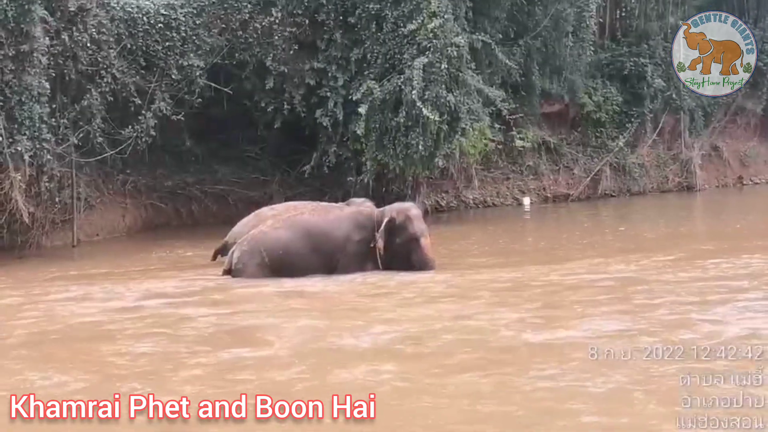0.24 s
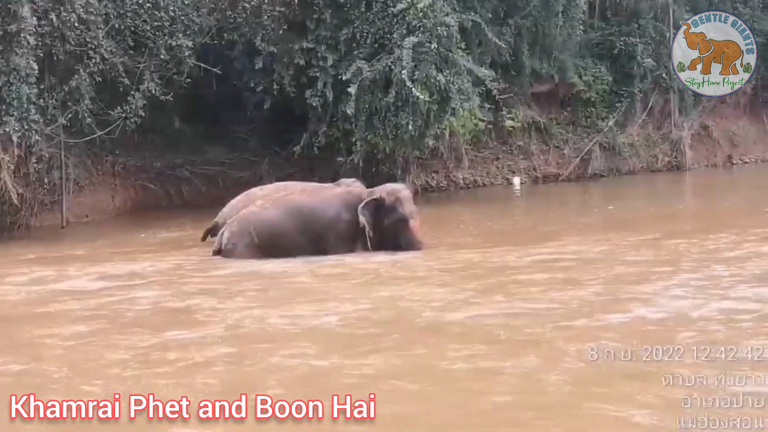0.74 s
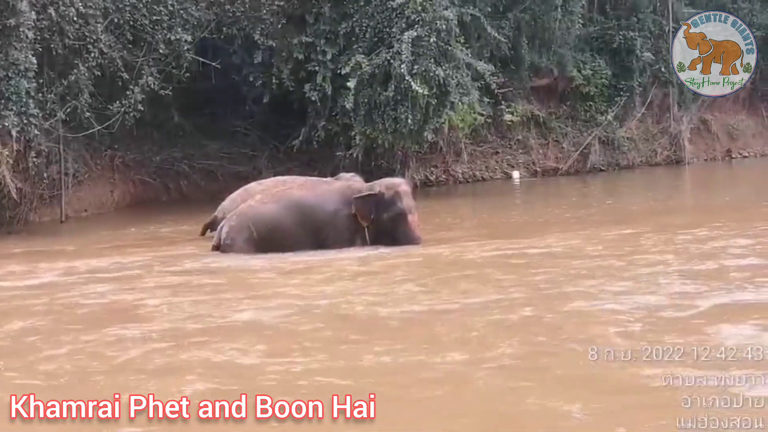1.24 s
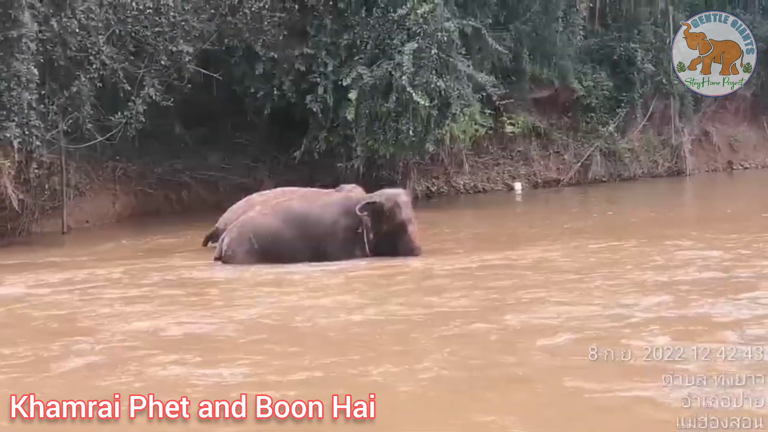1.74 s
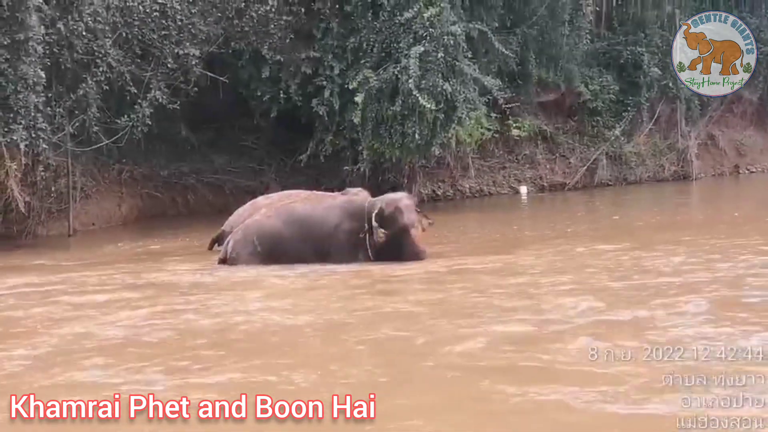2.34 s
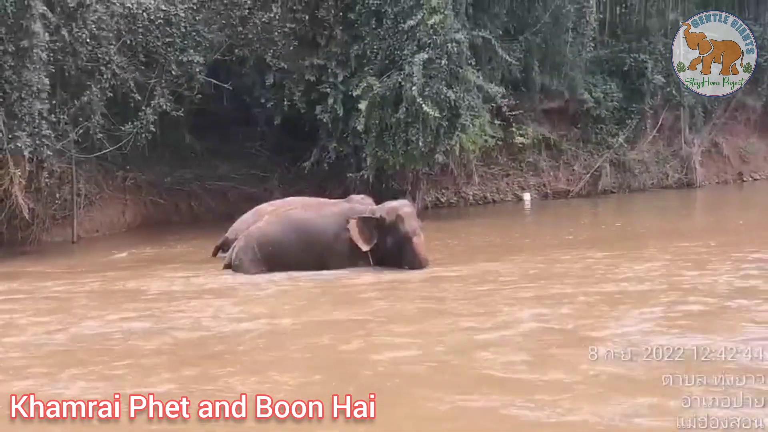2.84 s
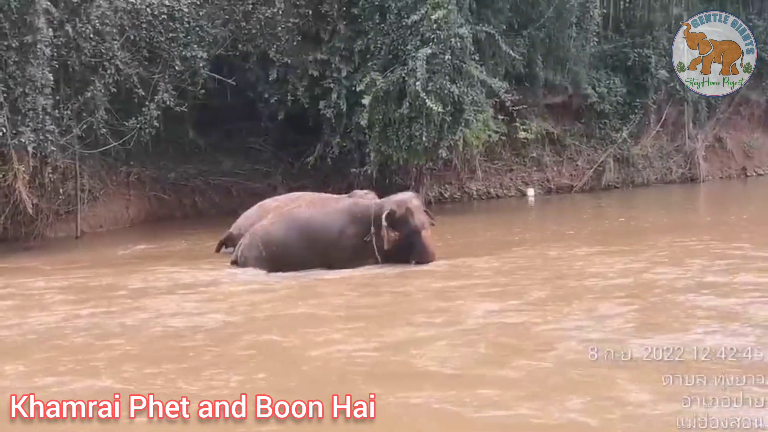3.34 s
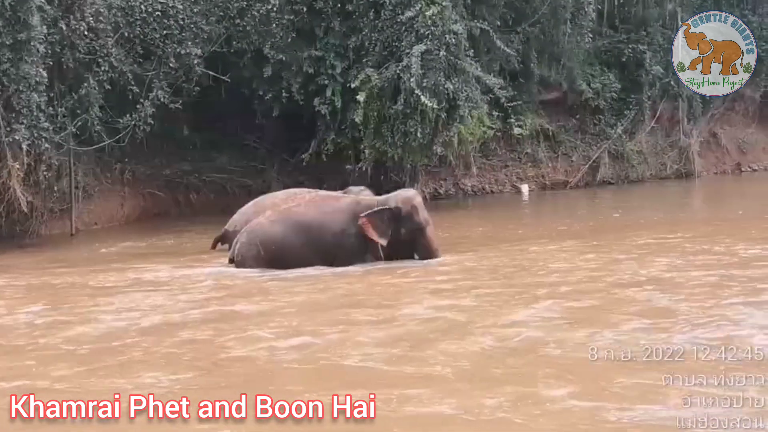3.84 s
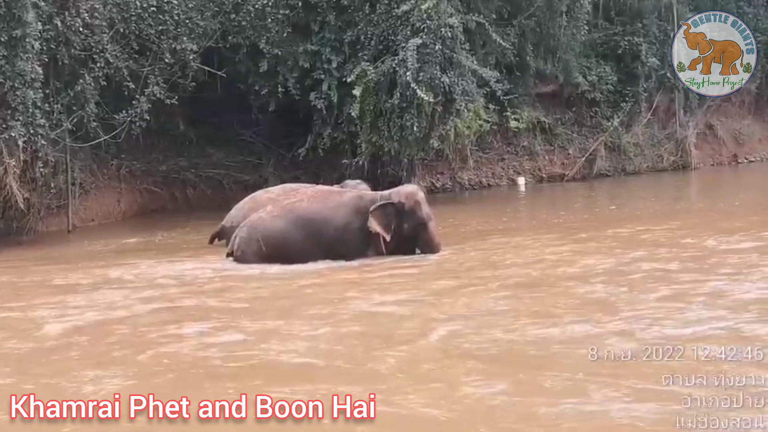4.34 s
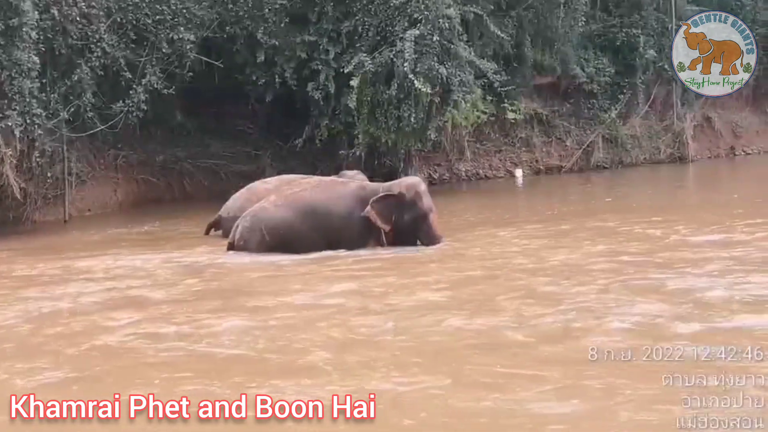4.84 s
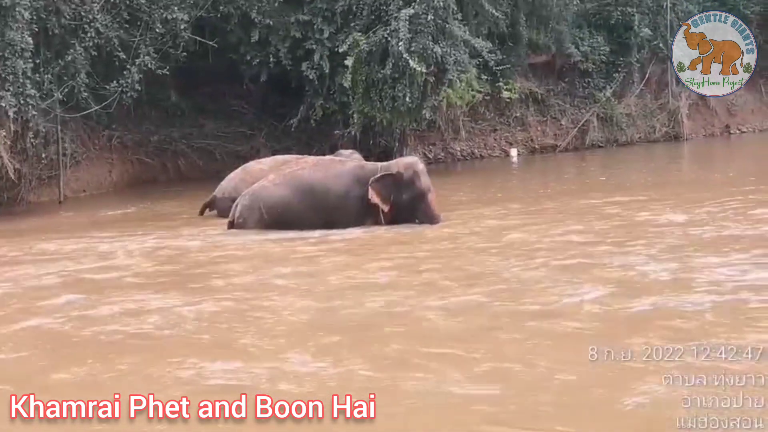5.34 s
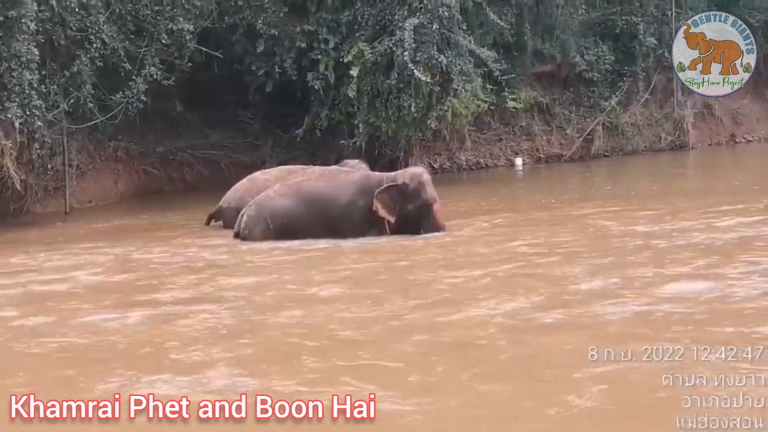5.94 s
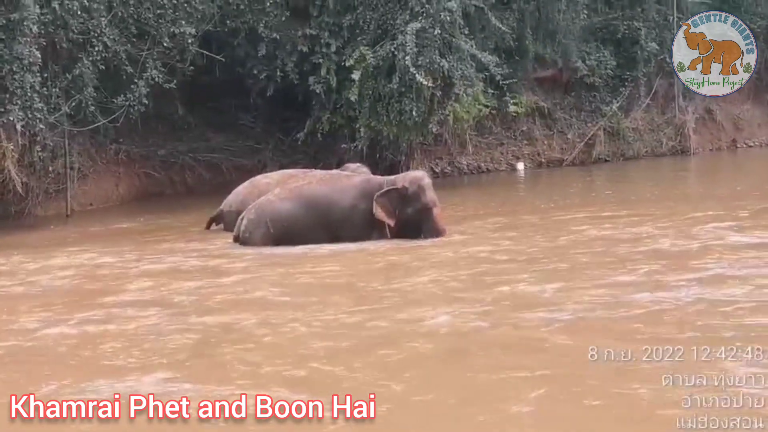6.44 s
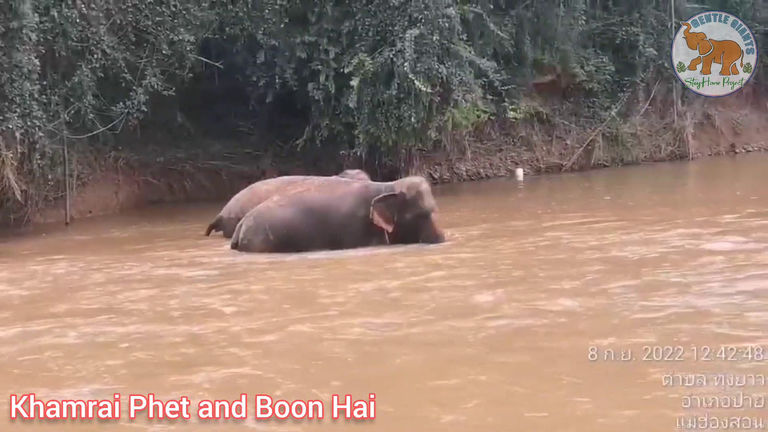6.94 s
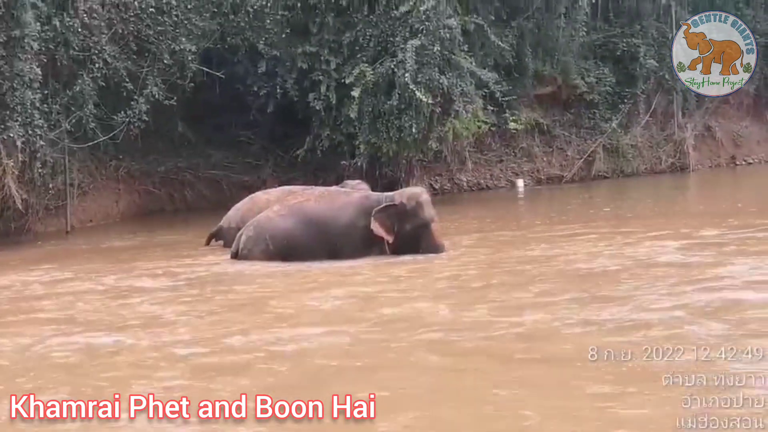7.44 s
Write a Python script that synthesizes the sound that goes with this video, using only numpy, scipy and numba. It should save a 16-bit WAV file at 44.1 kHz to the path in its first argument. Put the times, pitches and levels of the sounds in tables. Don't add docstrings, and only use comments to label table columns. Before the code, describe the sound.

A riverbank outdoors, heard on a phone whose left side is louder. From 0 s, low gusty wind buffets and pops against the microphone over restrained, slightly patchy water hiss, with tiny drips and barely audible bird peeps near 0.8 s. At 1.55 s an elephant starts a slow purr of separate throat pulses, opening by 2 s into a harsh, hollow roar. It swells around 2.3 s and again near 2.75 s, crackling and raspy, with an unsteady low singing tone inside; the water hiss brightens with it. From 3 s it collapses, fading into slow pulses by 4 s with a short outdoor echo. From about 4.3 s a second elephant gives a deep, steady, closed-mouth flutter, about 25 pulses a second, growing slightly toward 7.6 s. Drips continue, a faint chirp comes at 5.9 s, a plop at 7 s, and sharp wind slaps crowd the last second.

```python
import sys
import numpy as np
from scipy import signal
from scipy.io import wavfile
from scipy.ndimage import uniform_filter1d
from numba import njit

SR = 44100
rng = np.random.default_rng(int(sys.argv[2]) if len(sys.argv) > 2 else 0)


def inscribe(sig):
    pcm = np.round(np.clip(np.atleast_2d(sig).T, -1, 1) * 32767)
    wavfile.write(sys.argv[1], SR, pcm.astype(np.int16))


def gain_from_db(level_db):
    decades = np.asarray(level_db, float) / 20
    return 10 ** decades


N = 339570
T = np.arange(N) / SR
LEFT_DB = 9

# time in seconds, turbulent share 0-1, loudness in dB.
CALL = [(1.55, 0.05, -59.5), (1.64, 0.4, -52), (1.84, 0.45, -44.5), (2.02, 0.58, -33), (2.28, 0.82, -25.5),
        (2.42, 0.78, -23), (2.55, 0.98, -28), (2.74, 0.99, -25), (2.95, 0.38, -23), (3.03, 1, -29),
        (3.21, 0.76, -43), (3.42, 0.85, -45), (3.58, 0.35, -50), (3.85, 0.37, -52), (3.97, 0.53, -59),
        (4.2, 0.25, -57), (4.6, 0.38, -56.5), (4.9, 0.22, -57.5), (5.2, 1, -63.5), (5.5, 0.46, -59),
        (5.95, 0.2, -60.5), (6.3, 0.8, -63), (7.7, 0.5, -58.5)]
# time in seconds, flaps done so far.
FLAPS = [(0, -33), (1.556, 1), (1.644, 3), (1.805, 7), (1.917, 10), (3.217, 60), (3.478, 67), (3.714, 73),
         (3.853, 76), (4.101, 81), (4.368, 86), (4.744, 93), (4.952, 97), (5.364, 105), (5.569, 109),
         (5.972, 117), (6.88, 135), (7.7, 151.2)]
# time in seconds, even minus odd in dB,
# half length in seconds.
LIMPS = [
    (4.3, 3, 0.14),
    (5.47, -6.5, 0.064),
]


def roarer():
    (turbulence, loudness_db), (flaps,) = curves(CALL), curves(FLAPS)
    turbulence = np.clip(turbulence, 0, 1)
    scatter = 0.05 + (0.6 - 0.05) * opened((0, 1)) ** 2
    hard_closings = snaps(loudness_db)
    drive = folds(flaps, scatter, turbulence, swells(LIMPS), 1.35) + hard_closings
    voice = throat(drive, hard_closings, turbulence)
    return gain_from_db(loudness_db) * voice * gate(1.52, 9, 0.041) + rasp(drive) + song()


# time in seconds, opening 0-1, jaw resonance in Hz, throat resonance in Hz,
# tongue drawn back 0-1.
MOUTH = [(1.6, 0, 108, 273, 0.43), (1.95, 0.46, 143, 267, 0.13), (2.1, 0.78, 167, 348, 0.89),
         (2.4, 1, 213, 354, 0.1), (2.62, 0.85, 206, 331, 0.68), (2.8, 0.96, 186, 308, 0.12),
         (2.96, .95, 191, 284.6, 0.3), (3.15, 0.39, 135.4, 306.5, 0.07), (4.2, 0, 111.3, 325, 0.16)]


def opened(pair):
    shut, wide = pair
    return shut + (wide - shut) * curves(MOUTH)[0]


# time in seconds, lift in dB, half length in seconds.
STRAINS = [
    (1.85, 1, 0.093),
    (2.04, 12, 0.014),
    (2.27, 29, 0.21),
    (2.5, 16, 0.042),
    (2.76, 17, 0.16),
    (3.5, 3, 0.092),
]
# centre in Hz, width in Hz, level in dB.
UPPER = [(1359, 82, -3), (1890, 43, -10)]
# centre in Hz, width in Hz, dB mouth shut, dB mouth open.
VALLEYS = [(470, 74, -25.5, -21.5), (818, 53, -30, -30), (692, 98, -34, -19)]


def throat(drive, hard_closings, turbulence):
    _, jaw_hz, throat_hz, tongue = curves(MOUTH)
    third_hz = opened((642, 642)) * (1 - 0.23 * tongue)
    fourth_hz = opened((763, 792)) * (1 - 0.22 * tongue)
    tract = jaw_hz, throat_hz, third_hz, fourth_hz, opened((853, 980))
    widths_hz = 30, 90, 62, 85, 60
    rung = []
    for hz, width in zip(tract, widths_hz):
        unsteady_hz = hz * (1 + 0.035 * turbulence * walk(25))
        rung.append(ring(drive, unsteady_hz, width, 0.8 * turbulence))
    jaw, second, third, fourth, fifth = rung

    strain_db = swells(STRAINS)
    low_db = opened((12.5, -11)) + swells([(2.61, 7.1, 0.042)])
    mid_db = opened((5, -12)) + 0.39 * strain_db
    upper_db = opened((-5.5, -37)) + strain_db

    fifth_db = swells([(2.405, -16, 0.16), (1.88, 6, 0.14), (2.78, 7, 0.087)])
    sag = 1 - 0.038 * np.clip((T - 2.27) / 0.27, 0, 1)
    late_swells = (3.3, 4.7, 0.05), (2.8, -18, 0.25)
    cavities = 0
    for k, (hz, width, db) in enumerate(UPPER):
        cavity_db = db + 4.8 * walk(16) + swells([late_swells[k]])
        cavities = cavities + (-1) ** k * gain_from_db(cavity_db) * ring(drive, hz * sag, width)
    upper = gain_from_db(fifth_db) * fifth + gain_from_db(-12.5 + 9.7 * turbulence) * cavities

    second_db = -3.5 * gate(2.54, 2.7, 0.081)
    middle = third - gain_from_db(-16.5 + 13.8 * turbulence) * fourth
    voice = gain_from_db(low_db) * jaw - gain_from_db(second_db) * second
    voice = voice + gain_from_db(mid_db - 5.5) * middle + gain_from_db(upper_db - 6.5) * upper
    voice = voice + gain_from_db(opened((-2, -12))) * ring(drive, 224.5, 99)
    for hz, width, *leak_db in VALLEYS:
        voice = voice + gain_from_db(opened(leak_db)) * level(band(drive, hz, width))
    return voice + gain_from_db(-14.5) * ring(hard_closings, 495, 240)


# time in seconds, peak in dB.
SNAPS = [(2.04, -28), (2.078, -32.5), (2.123, -28), (2.161, -30), (2.181, -30), (2.219, -25), (2.249, -24),
         (2.274, -19.5), (2.301, -24), (2.341, -19.5), (2.383, -27.5), (2.426, -26), (2.453, -29),
         (2.477, -19.5), (2.526, -29), (2.558, -35.5), (2.61, -25), (2.636, -19.5), (2.706, -28),
         (2.746, -27), (2.772, -25), (2.824, -21), (2.852, -26.5), (2.9, -34), (2.941, -29), (2.968, -29),
         (3.089, -36), (3.114, -28), (3.217, -30), (3.29, -37.5)]


def snaps(call_db):
    out = np.zeros(N)
    for s, db in SNAPS:
        i = int((s - 0.000997) * SR)
        out[i] = np.sqrt(SR / 38) * gain_from_db(db - call_db[i] - 6)
    return out


# time in seconds, half length in seconds, level in dB.
RASPS = [(2.253, 0.057, -51), (2.3, 0.015, -55), (2.62, 0.01, -51), (2.646, 0.009, -50),
         (2.731, 0.018, -52.5), (2.78, 0.015, -55), (2.85, 0.035, -53)]
# centre in Hz, width in Hz, level in dB.
RASP = [(2220, 220, -7), (2780, 260, -3), (3590, 260, -9), (4350, 400, -10)]
# time in seconds, centre in Hz, level in dB.
WANDER = [(2.1, 2750, -80), (2.2, 2900, -59), (2.3, 3100, -67), (2.4, 2700, -85), (2.47, 2720, -64.5),
          (2.52, 3460, -63), (2.65, 3750, -61), (2.75, 3540, -61), (2.8, 3600, -64), (2.86, 2640, -58),
          (2.9, 2700, -70), (2.93, 4470, -72), (2.97, 4470, -52), (3.04, 4650, -59), (3.09, 4400, -68),
          (3.15, 4550, -61), (3.25, 4550, -77)]
# time in seconds, half length in seconds, level in dB,
# middle pitch in Hz, glide in Hz per second.
SIDE_LINES = [(2.545, .075, -38, 745, -560), (2.55, .08, -36, 200, -60), (2.3, .05, -37, 585, 100),
              (2.92, .05, -38, 645, -250), (2.73, .025, -43, 850, 0), (2.13, .025, -41, 560, 0)]


def rasp(drive):
    harsh = sum(gain_from_db(db) * bump(s, half) for s, half, db in RASPS)
    small = sum(gain_from_db(db + 2.0 * walk(31.3)) * ring(drive, hz, width) for hz, width, db in RASP)
    wander_hz, wander_db = curves(WANDER)
    wandering = gain_from_db(wander_db + 1.4 * walk(30)) * ring(drive, wander_hz, 210) * gate(2.1, 3.25, 0.02)
    wobble, flutter = 0.03 * walk(90), gain_from_db(4 * walk(70))
    lines = sum(whistle(*row, wobble=wobble) for row in SIDE_LINES)
    return harsh * small + wandering + np.sqrt(2) * flutter * lines


# time in seconds, pitch in Hz, level in dB.
SONG = [(2.18, 329.6, -35), (2.224, 346.8, -26), (2.276, 401.5, -22), (2.338, 393.6, -22.5),
        (2.39, 370.8, -31), (2.432, 324.7, -21), (2.455, 346.3, -26), (2.478, 374.2, -21.5),
        (2.52, 365.8, -24.5), (2.56, 358.5, -24), (2.62, 353.9, -20), (2.668, 356.4, -20.5),
        (2.705, 386.5, -15), (2.728, 350.8, -25), (2.75, 366.7, -24), (2.77, 378.2, -20),
        (2.82, 375.3, -22.5), (2.88, 383.4, -20), (2.908, 346.2, -21), (2.926, 339.3, -30),
        (2.944, 323, -23), (2.968, 281, -18.5), (2.99, 273, -27), (3.03, 269, -30), (3.12, 271, -43)]


def song():
    hz, db = curves(SONG)
    turn = 2 * np.pi * np.cumsum(hz * (1 + 0.016 * walk(70))) / SR
    loudness = np.sqrt(2) * gain_from_db(db + 1.1 * walk(55))
    octave = gain_from_db(-24 + 4.7 * walk(60)) * np.sin(2 * turn)
    return loudness * (np.sin(turn) + octave) * gate(2.17, 3.15, 0.026)


def folds(phase, scatter, turbulence, limp_db=0., uneven_db=1.5):
    hz = np.maximum(np.gradient(phase) * SR, 1)
    phase = np.maximum.accumulate(phase + scatter * walk(30))
    cycle = np.floor(phase).astype(int)
    size_db = rng.standard_normal(N // 100)[cycle] * uneven_db + limp_db * (-1.) ** cycle
    clicks = np.diff(cycle, prepend=cycle[0]) * np.sqrt(SR / hz)
    puffs = rng.standard_normal(N) * 1.8 * np.exp(-(phase % 1) / 0.6)
    return gain_from_db(size_db) * (np.sqrt(1 - turbulence) * clicks + np.sqrt(turbulence) * puffs)


# time in seconds, level in dB.
ANSWER = [(4.3, -47.5), (4.55, -49.5), (5.0, -50), (6.0, -49.5), (6.89, -49), (7.35, -47), (7.7, -45.5)]
# time in seconds, flaps a second.
ANSWER_HZ = [(4.4, 23.2), (4.64, 23.7), (5.1, 24.4), (6.87, 25.7), (7.0, 25.4), (7.23, 25.9), (7.68, 26.0)]
# centre in Hz, width in Hz, level in dB.
CHEST = [(72.57, 60, 0.5), (128.7, 44, 7.5), (201.6, 35, 4), (269.4, 29.5, -6.5), (313.3, 21, -11.5),
         (788, 37, -17), (2057, 56, -25)]


def answerer():
    (hz,), (db,) = curves(ANSWER_HZ), curves(ANSWER)
    drive = folds(np.cumsum(hz) / SR, 0.005, 0.02, uneven_db=0.9)
    rise = hz / 24.4
    voice = 0
    for k, (centre, width, chest_db) in enumerate(CHEST):
        voice = voice + (-1) ** k * gain_from_db(chest_db + 1.64 * walk(4.6)) * ring(drive, centre * rise, width)
    return gain_from_db(db - 1) * voice * gate(4.13, 9, 0.54)


# time in seconds, peak in dB, left minus right in dB,
# half length in seconds.
GUSTS = [(-0, -32, 22, 0.11), (0.293, -35.5, 12, 0.055), (0.477, -35, 34, 0.2), (0.897, -35, 11, 0.06),
         (1.025, -37, 26, 0.033), (1.2, -34, 22, 0.016), (1.387, -30.5, 28, 0.056), (1.685, -27, 27, 0.009),
         (2.084, -43, 36, 0.012), (3.064, -26.5, 17, 0.05), (3.3, -31, 32, 0.058), (4.118, -44, 26, 0.074),
         (4.276, -33.5, 30, 0.02), (4.574, -33, 6, 0.11), (4.716, -33, 38, 0.098), (5.248, -37, 2, 0.2),
         (5.53, -36.5, -2, 0.045), (5.917, -40.5, 7, 0.041), (6.263, -29.5, 13, 0.088),
         (6.718, -38, -17, 0.087), (6.77, -29.5, 5, 0.042), (7.017, -32.5, 5, 0.055),
         (7.184, -42, -23, 0.069), (7.231, -25.5, 7, 0.01), (7.407, -26.5, 2, 0.048),
         (7.678, -40, -2, 0.14)]
# time in seconds, port 0 left 1 right, level in dB, sharpness in ms.
SLAPS = [(0.271, 0, -12.5, 1.6), (0.285, 0, -46, 2.6), (0.672, 0, -16, 2.2), (0.912, 1, -51, 2.3),
         (1.178, 0, -15, 1.8), (1.35, 1, -18, 2.3), (1.378, 0, -14.5, 2.8), (4.562, 0, -11.5, 1.5),
         (6.464, 0, -12.5, 0.93), (6.644, 1, -15.5, 1.23), (6.721, 1, -14.5, 0.99), (6.775, 0, -10, 1.5),
         (6.836, 0.77, -27, 3), (7.026, 0, -18.5, 0.58), (7.184, 1, -11, 1.7), (7.431, 0, -6, 1.2),
         (7.439, 1, -15, 1.4), (7.597, 1, -19, 1.1), (7.67, 1, -12, 0.94)]
# time in seconds, level in dB, extra reach in dB per octave.
BREEZE = [(0, -53.5, 1), (1.0, -41.5, -6.5), (1.9, -40.5, 3.5), (2.85, -39, -8.5), (3.5, -39.5, 2.5),
          (4.15, -36, -5), (5.0, -50.5, 2.5), (6.0, -35, -1.5), (6.6, -35, -1.5), (7.7, -43.5, 4.5)]
# time in seconds, change in dB, half length in seconds.
LULLS = [
    (.2, -11, 0.029),
    (.79, -5, 0.047),
    (1.05, 3, 0.15),
    (1.52, -2.5, 0.11),
    (4.0, -6.5, 0.18),
]
# frequency in Hz, level in dB per Hz.
WIND = [(15, -4), (38, -2), (70, -2), (108, -5), (150, -10), (190, -18), (270, -36), (400, -54), (600, -64)]


def wind():
    def share(pan_db):
        return gain_from_db(12) / (1 + gain_from_db(-2 * pan_db))

    breeze_db, calm_reach_db = curves(BREEZE)
    lull_db = swells(LULLS)
    ports = []
    for side in (1, -1):
        calm = gain_from_db(2 * (breeze_db + lull_db)) * share(side * 11)
        gusty = calm
        for s, db, pan_db, half in GUSTS:
            gusty = gusty + gain_from_db(2 * db) * share(side * pan_db) * bump(s, half)
        port_db = 10 * np.log10(gusty)
        reach_db = calm_reach_db + 0.51 * lull_db - 0.22 * 10 * np.log10(gusty / calm)
        lump, air, rumble = walk(28), rng.standard_normal((2, N)), 0
        for k, hz in enumerate(16 * 2 ** np.arange(0, 5.3, .5)):
            octaves_up = max(np.log2(hz / 45), 0)
            swing_db = octaves_up * (reach_db + 1.7 * lump) + 1.1 * lump + 1.2 * walk(8)
            rumble = rumble + gain_from_db(colour(WIND, hz) + swing_db) * band(air[k % 2], hz, hz / 5.03)
        rumble = rumble / np.std(band(rumble, 37, 73)) * gain_from_db(-0.5)
        passing = rng.random(N) < 22 / SR
        eddies = passing * rng.laplace(size=N) * gain_from_db(-2.0 + 4.3 * reach_db)
        eddies = signal.fftconvolve(eddies, cusp(.05, 2.6)[:SR // 10], "same")
        ports.append(gain_from_db(port_db) * (rumble + eddies))
    ports = np.array(ports)
    for s, port, slap_db, ms in SLAPS:
        ports[int(port)] += gain_from_db(slap_db) * cusp(s, ms)
    return ports


def cusp(s, ms):
    u = (T - s) * 1000 / ms
    return 1.6 * np.exp(-np.sqrt(u ** 2 + .25)) - .35 * np.exp(-(u / 4.5) ** 2)


# frequency in Hz, level in dB per Hz.
RIVER = [(450, -6.5), (760, 1.5), (1300, -4), (2100, -1), (2600, -5.5), (3600, -7), (5500, -7.5),
         (6700, -4.5), (8000, -10.5), (9100, -7), (10200, 0), (11400, -10.5), (13000, -13.5),
         (15300, -20.5)]
# frequency in Hz, left minus right in dB.
BALANCE_DB = [(500, 5), (1300, 11), (2400, 10.5), (4400, 4.5), (9500, 11), (15000, 14.5)]


def river():
    hz, s, cells = signal.stft(rng.standard_normal((2, N)), SR, nperseg=1024)
    hz = np.maximum(hz, 1)[:, None]
    shape = cells.shape[1:]
    lift_db = noise_filter()[np.minimum(s * SR, N - 1).astype(int)]
    treble_db = -63.5 + lift_db
    middle_db = -63.5 - 2.5 + 0.68 * lift_db
    lapping_db = -59.5 + 0.35 * (treble_db - treble_db.mean())
    shape_db = colour(RIVER, hz)
    gain_db = np.zeros(shape)
    for lo, hi, db in ((0, 2197, lapping_db), (2193, 7700, middle_db + 2.0), (7698.0, SR, treble_db + 3.0)):
        part = (hz >= lo) & (hz < hi)
        gain_db += part * (shape_db + db - 10 * np.log10(np.mean(part * gain_from_db(2 * shape_db))))
    blotch_db = 1.64 * patches(shape, bins=150, frames=1.5) + 2.0 * patches(shape, bins=12, frames=3)
    blotch_db = blotch_db + 3.68 * patches(cells.shape, bins=2.2, frames=2.5)
    threshold = 1.8 - 1.1 * np.exp(-((hz - 5470) / 200) ** 2)
    hole_db = -22 * (patches(shape, bins=6, frames=5) > threshold) * (hz > 1800)
    side_db = -colour(BALANCE_DB, hz) * np.array([0, 1])[:, None, None]
    cells = cells * gain_from_db(gain_db + blotch_db + hole_db + side_db)
    return signal.istft(cells, SR, nperseg=1024)[1][:, :N] + drips() + bubbles()


# time in seconds, lift in dB, half length in seconds.
SURGES = [(0.09, 6.5, 0.022), (0.954, -1, 0.71), (1.22, 6, 0.016), (1.9, 3.5, 0.24), (2.247, 5.5, 0.076),
          (2.4, 5.5, 0.1), (3.045, 4, 0.084), (5.605, 1.5, 0.59), (6.349, 2, 0.28), (7.02, 7, 0.039),
          (7.498, 3, 0.1)]


def noise_filter():
    step = 1 / (0.23 * SR)
    return 18 * signal.lfilter([step], [1, step - 1], curves(MOUTH)[0]) + swells(SURGES)


def patches(shape, bins, frames):
    field = uniform_filter1d(rng.standard_normal(shape), int(bins), axis=-2)
    field = uniform_filter1d(field, int(frames), axis=-1)
    return field / field.std()


# time in seconds, peak in dB, pitch in Hz, left minus right in dB.
DRIPS = [(0.099, -37, 9500, 13), (0.2994, -48, 10700, 20), (0.6054, -68, 10300, 16),
         (0.6549, -68, 9850, 13), (1.105, -45, 10800, 26), (1.5005, -46, 9800, 18),
         (2.219, -25.5, 10000, 30), (2.643, -34, 6570, 13), (4.331, -48, 10000, 20),
         (4.689, -42.5, 7700, 14.5), (4.793, -43.5, 11000, 16), (4.9726, -46.5, 9400, 9),
         (5.5246, -40, 6640, 8), (5.7229, -44, 9400, 8), (5.793, -39.5, 6200, 17), (6.101, -45, 6430, 15),
         (6.4708, -44, 10500, 15), (6.808, -40.5, 9900, 12), (6.9924, -47, 6600, 7),
         (7.035, -42.5, 8200, 10), (7.388, -45, 5170, 10), (7.4733, -35.5, 6800, 20), (7.5, -42, 6870, 16)]


def drips():
    out, spray = np.zeros((2, N)), rng.standard_normal((2, N))
    for s, db, hz, pan_db in DRIPS:
        u = np.maximum(T - s, 0)
        ringing = band(spray[0], hz, hz / 5) * 4 * np.exp(-u / 0.0086)
        splash = ringing + spray[1] * 0.5 * np.exp(-u / 0.0053)
        out += gain_from_db(db - 7.0) * np.clip(u / 0.00073, 0, 1) * splash * np.array([[1], [gain_from_db(-pan_db)]])
    return out


# time in seconds, level in dB, pitch in Hz, 60 dB decay in seconds.
BUBBLES = [
    (4.6, -55, 1120, .03),
    (6.991, -37, 880, .018),
]


def bubbles():
    out = np.zeros((2, N))
    for s, db, hz, t60 in BUBBLES:
        u = np.maximum(T - s, 0)
        tone = np.sin(2 * np.pi * hz * u * (1 + 0.0024 * u / t60 ** 2))
        swell = (u / t60 * 9) * np.exp(-u * 5 / t60)
        out += gain_from_db(db) * tone * swell * np.array([[1], [gain_from_db(-LEFT_DB)]])
    return out


# time in seconds, half length in seconds, level in dB, middle pitch in Hz,
# glide in Hz per second, share the pitch sags at the ends.
BIRD = [
    (5.915, .04, -63.5, 2480, 600, .09),
    (.716, .018, -67, 5700, 0, 0),
    (.757, .014, -69, 5580, -2500, 0),
    (.825, .017, -66, 5820, -7000, 0),
    (.84, .012, -69, 5300, -9000, 0),
]


def bird():
    return sum(whistle(*row) for row in BIRD)


def whistle(s, half, db, hz, glide, sag=0., wobble=0.):
    u = np.clip(T - s, -3 * half, 3 * half)
    pitch = (hz + glide * u) * (1 - sag * np.minimum((u / half) ** 2, 2)) * (1 + wobble)
    return gain_from_db(db) * bump(s, half) * np.sin(2 * np.pi * np.cumsum(pitch) / SR)


def ring(drive, hz, width, hold=0.):
    y = svf(band(drive, hz, 1.25 * width), hz + np.zeros(N), 1.8 * width) * np.sqrt(SR / width / 2.48)
    power = uniform_filter1d(uniform_filter1d(y ** 2, size=900), size=900)
    return y / (power + 0.18) ** (hold / 2)


def band(x, hz, width):
    hz = np.clip(hz + np.zeros(N), 5, SR * .45)
    return svf(svf(x, hz, 1.325 * width), hz, 1.325 * width)


@njit
def svf(x, hz, width):
    y, b, l = np.empty(len(x)), 0., 0.
    for i in range(len(x)):
        g, k = np.tan(np.pi * hz[i] / SR), width / hz[i]
        v = (b + g * (x[i] - l)) / (1 + g * (g + k))
        b, l, y[i] = 2 * v - b, l + 2 * g * v, k * v
    return y


def walk(rate):
    k = int(SR / rate)
    held = np.repeat(rng.standard_normal(N // k + 1), k)
    return 1.3 * uniform_filter1d(uniform_filter1d(held, k), k)[:N]


def curves(table):
    s, *columns = np.transpose(table)
    return [np.interp(T, s, c) for c in columns]


def colour(table, hz):
    table_hz, db = np.transpose(table)
    return np.interp(np.log(hz), np.log(table_hz), db)


def swells(rows):
    return sum(db * bump(s, half) for s, db, half in rows)


def bump(s, half):
    return np.exp(-((T - s) / half) ** 2)


def gate(t0, t1, fade):
    return np.clip((T - t0) / fade, 0, 1) * np.clip((t1 - T) / fade, 0, 1)


def level(x):
    return x / np.sqrt(np.mean(x ** 2, axis=-1, keepdims=True))


def scene():
    voices = roarer() + answerer() + bird()
    u = T[:SR // 2]
    paths = rng.standard_normal((3, len(u)))
    decay = np.exp(-u * np.log(1000) / 0.28) * (u > .012)
    bank = level((paths[0] + 0.27 * paths[1:]) * decay) / np.sqrt(len(u))
    echo = signal.fftconvolve(voices[None], bank, axes=1)[:, :N]
    ports = np.array([[1], [gain_from_db(-LEFT_DB)]]) * 2 / (1 + gain_from_db(-LEFT_DB))
    return ports * (voices + gain_from_db(-12) * echo) + wind() + river()


def band_limit(x):
    return signal.sosfilt(signal.butter(12, 15290, fs=SR, output="sos"), x)


def record(dry):
    x = np.tanh(1.221 * dry) / 1.267 * gate(-1, N / SR, 0.0012)
    x = signal.sosfilt(signal.ellip(8, .2, 60, 15300, fs=SR, output="sos"), x)
    return band_limit(x)


dry = scene()
out = record(dry)
inscribe(out)
```